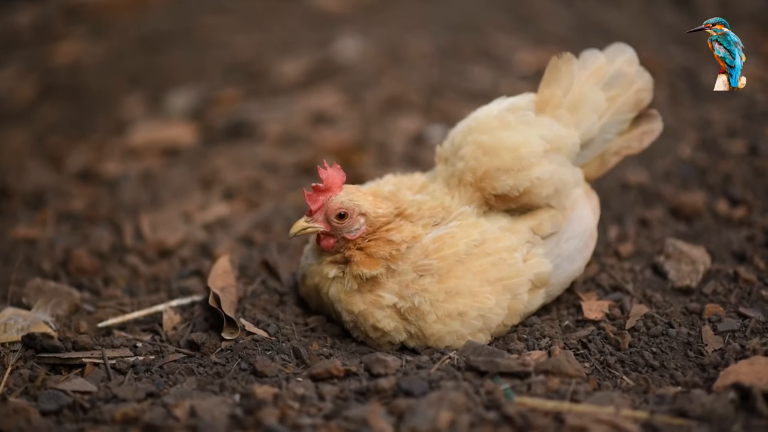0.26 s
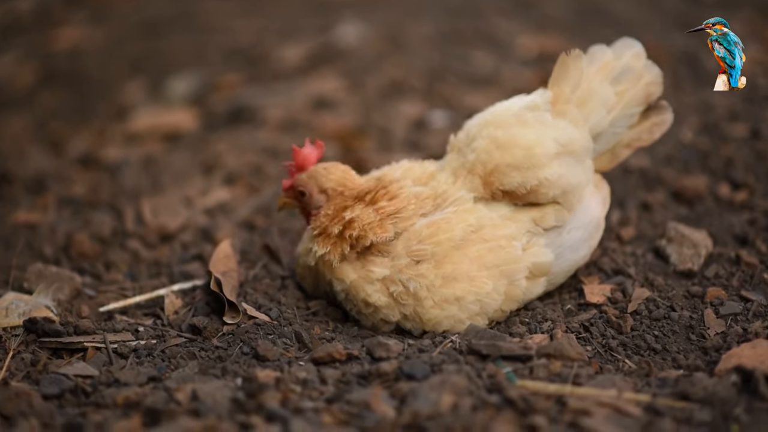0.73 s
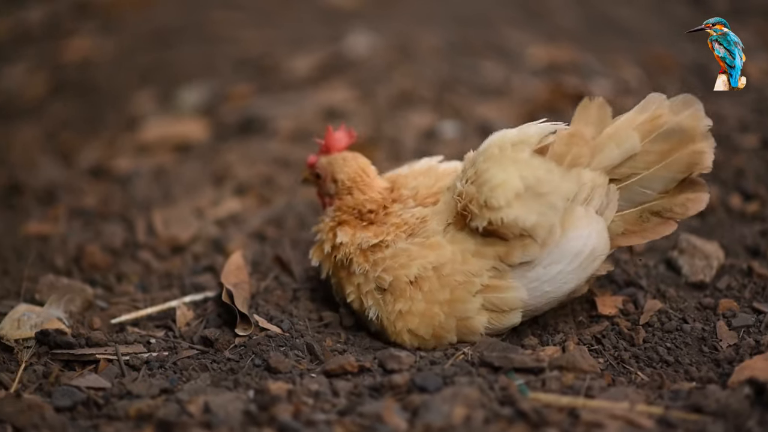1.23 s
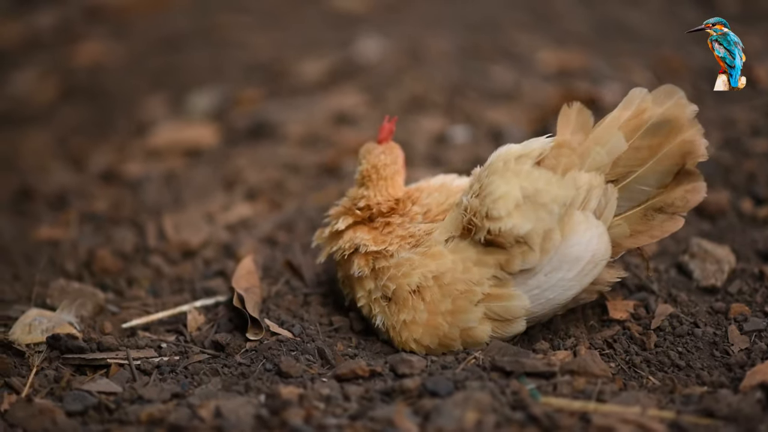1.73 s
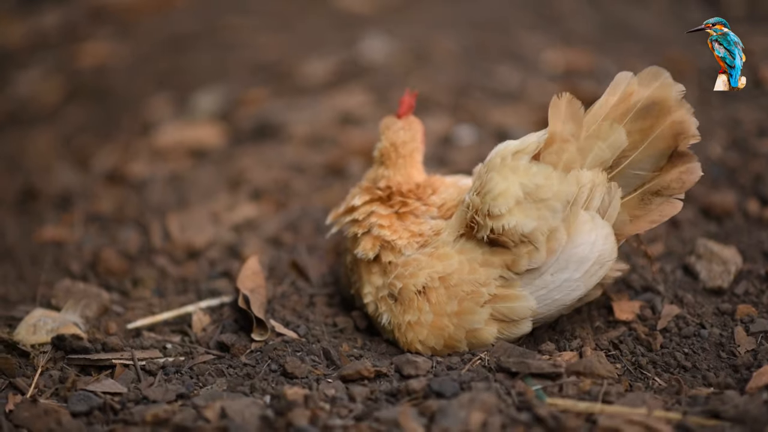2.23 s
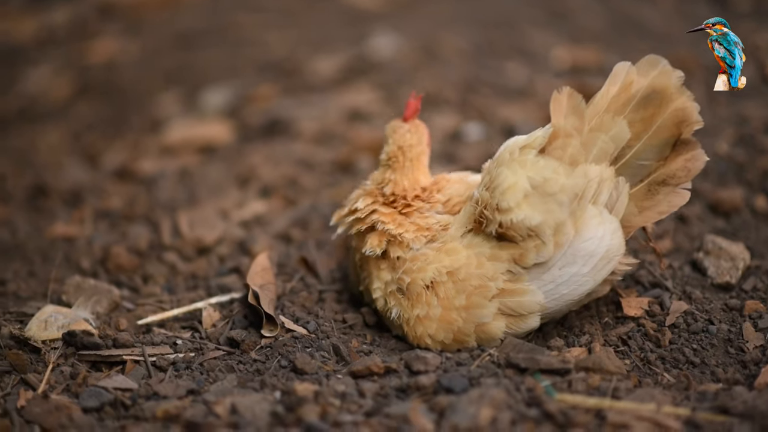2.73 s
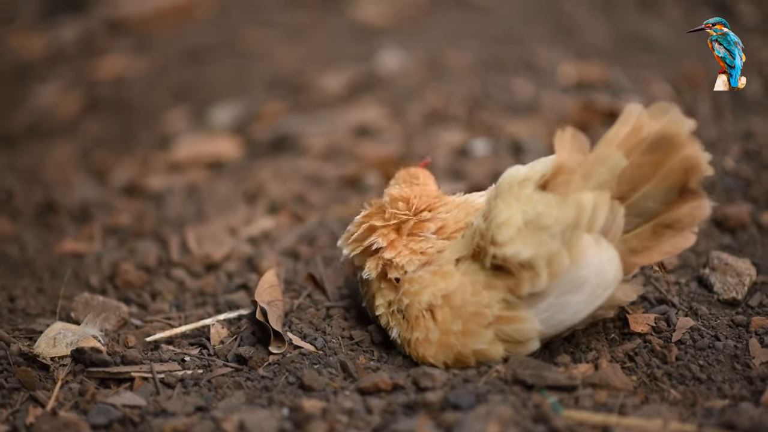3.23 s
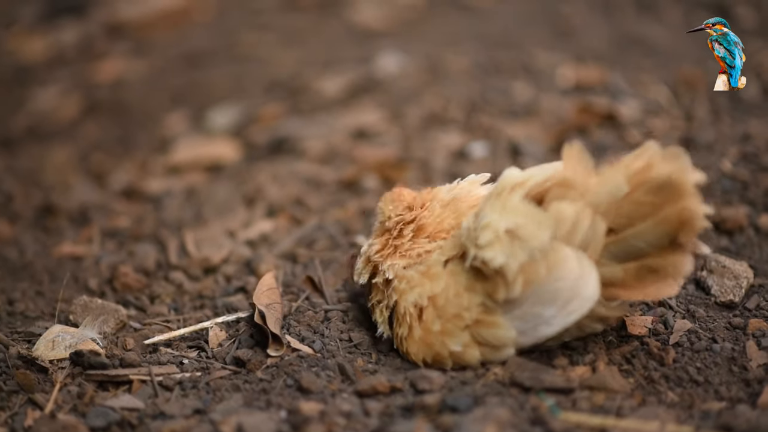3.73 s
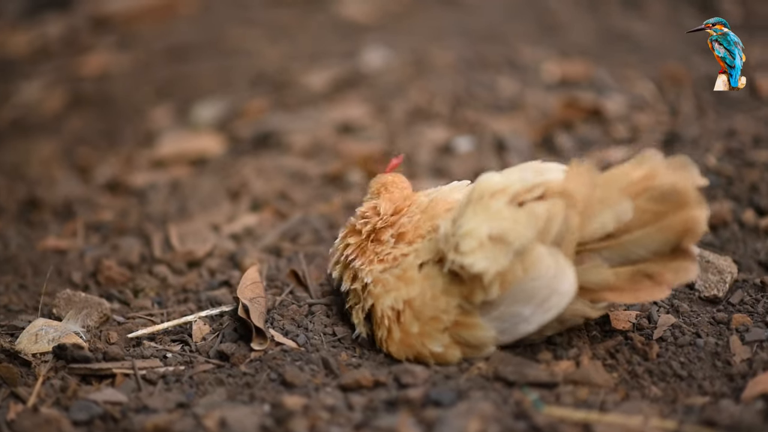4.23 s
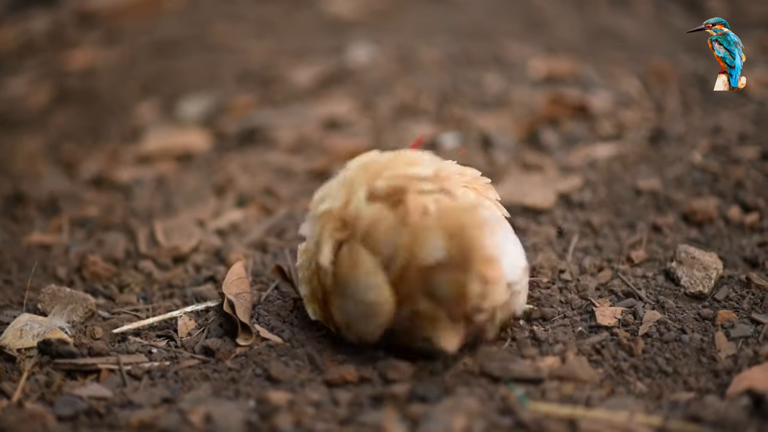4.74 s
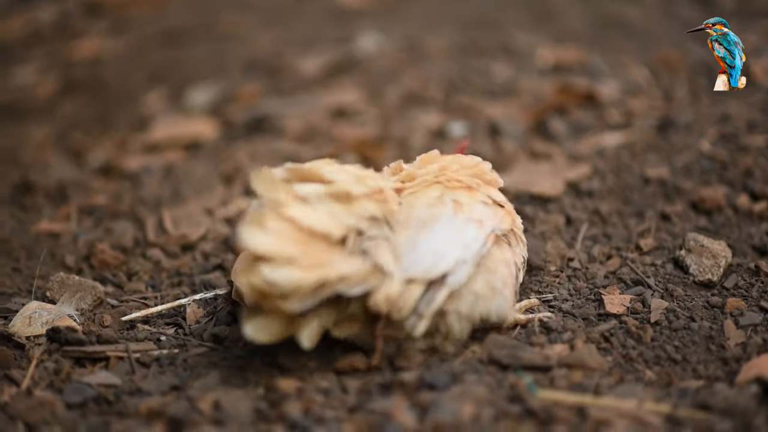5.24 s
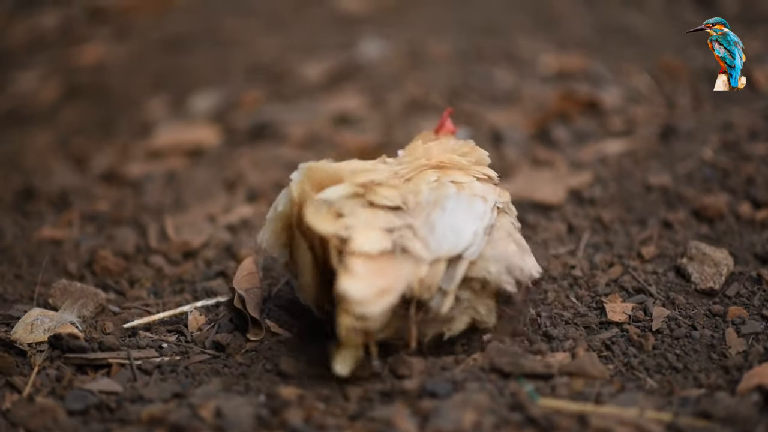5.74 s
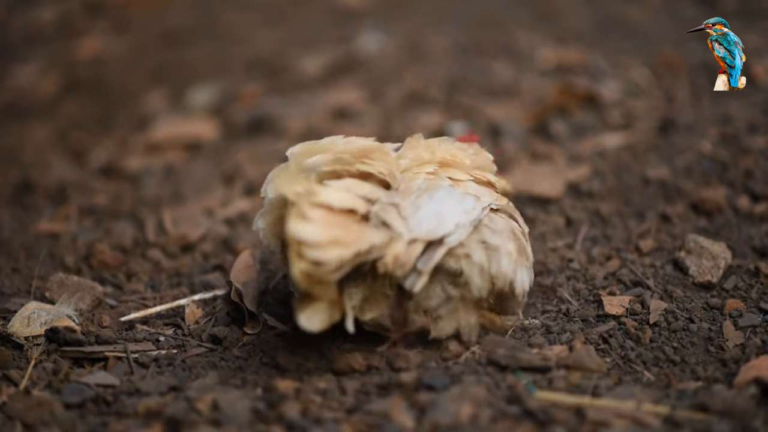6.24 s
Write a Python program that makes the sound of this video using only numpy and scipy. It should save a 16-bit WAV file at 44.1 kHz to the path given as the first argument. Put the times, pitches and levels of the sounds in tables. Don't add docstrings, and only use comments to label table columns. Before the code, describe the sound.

Raspy, strained cockerel crow in three parts with a held note, distant crows around it, followed by soft clucks, soil scratching and feather rustle.

```python
import sys
import numpy as np
from scipy import signal
from scipy.fft import rfft, irfft
from scipy.io import wavfile
from scipy.ndimage import uniform_filter1d

SR = 44100
rng = np.random.default_rng(int(sys.argv[2]) if len(sys.argv) > 2 else 0)


def store_pcm(level_fs):
    pcm = np.round(np.clip(level_fs, -1, 1) * 32767).astype(np.int16)
    wavfile.write(sys.argv[1], SR, np.atleast_2d(pcm).T)


def volts_from_db(level):
    exponent = np.asarray(level, float) / 20
    return 10 ** exponent


N = 285327
HZ = np.maximum(np.fft.rfftfreq(N, 1 / SR), 1)

# start_s, length_s, attack_s, level_db, sag_db
NEAR_HARSH = [(1.1, 0.16, .02, -23.5, 5), (1.373, .127, 0.016, -23, 8.5), (1.501, 0.084, 0.051, -23.5, 6),
              (1.642, .13, 0.0038, -24, 0), (1.77, 0.086, 0.0016, -23.5, 7), (1.997, 0.07, 0.033, -24, -1),
              (2.306, 0.032, 0.013, -31.5, 8), (2.424, 0.18, 0.0032, -25, 6),
              (2.061, 0.14, 0.0046, -45.5, 16.5), (2.291, 0.14, 0.011, -45, 2.5),
              (1.57, .08, .01, -35.5, 0)]
NEAR_BEAT_HZ = [864, 821, 899, 1011, 853, 826, 970, 901.3, 974, 972, 1010]
# resonance_hz, width_hz, level_db
OPENING_THROATS = [
    [(3600, 74, -19.0), (5900, 160, -22.0)] + [(860, 120, -12.0), (1450, 77, 3.5), (1836, 250, -3.5), (2454, 20.0, -4.0), (6260, 53, -23.5), (7600, 180, -7.0), (9260, 69, -15.0), (10400, 29, -24.0), (12100, 190, -28.5), (14250, 72, -32.0)],
    [(878, 11, -5.5), (1120, 150, -5.5)] + [(1510, 124, 1.5), (2075, 96, -5.0), (2542, 90, -0.5), (4044, 200, -5.5), (6915, 31, -14.0), (9080, 84, -7.5), (10020, 31, -15.5), (11330, 27, -15.5), (14260, 47, -43.5)],
    [(856, 8.8, -5.5)] + [(1067, 69.0, 0.5), (1477, 25.0, 9.0), (2010, 36, 9.5), (2485, 90, 1.0), (3940, 150, -0.5), (6740, 56, -6.0), (9030, 120, -3.0), (9960, 40, -5.5), (11100, 150, -10.5), (13700, 49, -30.0)],
]
# resonance_hz, width_hz, level_db
CLOSING_THROATS = [
    [(930, 64, -13.5), (3750, 240, -7.5)] + [(1463, 340, 9.5), (2485, 43, 6.5), (4635, 44, -8.5), (7170, 100, 1.5), (8620, 110, -2.5), (9940, 40, -14.0), (10920, 39, -10.0)],
    [(350, 110, -20.5), (815, 74, -7.0), (1430, 150, 1.0), (3600, 69, -12.0), (5320, 300, -17.5)] + [(1904, 120, 5.5), (2514, 64.0, -5.0), (6605, 32, -9.5), (7530, 46, -1.0), (8934, 80.0, -5.5), (11840, 162, -21.5), (13400, 39, -36), (14300, 37, -24.5)],
]
# resonance_hz, width_hz, level_db
LEAK_THROATS = [
    [(6700, 60, -6), (7280, 120, -1), (9200, 80, -9), (12200, 100, -14.5)],
    [(3800, 130, -9), (5190, 200, -15.5), (7500, 148, -0.5), (9100, 100, 2), (11500, 160, -12.5),
     (13000, 150, -12), (14500, 100, -14)],
    [(3950, 101, -6.5), (6900, 60, -3), (9050, 120, 4), (10000, 60, -3), (11380, 150, -6),
     (12800, 101, -16)],
]
THROAT_USED = [0, 1, 1, 2, 2, 3, 4, 4, 5, 6, 7]
# centre_hz, width_hz
DARK_POCKETS = [(4500, 350), (8150, 340)]
# centre_hz, width_hz
MIDDLE_POCKETS = [(5800, 480), (7800, 500)]
# time_s, pitch_hz, level_db (of second partial)
NEAR_CLEAR = [
    [(1.54, 985, -28), (1.575, 1013, -22.5), (1.64, 1027, -22), (1.67, 1011, -27.5), (1.74, 1015, -26),
     (1.775, 990, -26.5)],
    [(2.062, 977, -19.5), (2.16, 976.6, -19.5), (2.21, 972, -19.5), (2.32, 970, -20), (2.418, 971, -19.5),
     (2.445, 981, -28.5)],
]
# partial, level_db
CLEAR_ORDERS = [
    [(1, -5.5), (2, -1.5), (3, -21.5), (4, -10.5), (5, -37.5), (6, -60), (7, -30.5), (8, -36), (9, -16),
     (10, -30), (11, -30)],
]
# partial, mid_level_db, change_db
HELD_ORDERS = [(1, -18.5, 2), (2, -1, 3.5), (3, -29, -0.5), (4, -27.5, -0.5), (5, -41.5, 4.5), (6, -41, 20),
               (7, -14, 3), (8, -28, -1), (9, -12.5, -15), (10, -30, -2), (11, -32, 7), (12, -27.5, -13.5),
               (13, -32.5, -4), (14, -42, 1.5), (15, -39, 17), (16, -44, 3)]
# time_s, pitch_hz, level_db
WHISTLES = [
    [(1.084, 2350, -50.5), (1.092, 2000, -38), (1.097, 1900, -31.5), (1.101, 1450, -30.5),
     (1.107, 1280, -27), (1.112, 1600, -28), (1.119, 1700, -27)],
    [(1.366, 1650, -38), (1.371, 1420, -26), (1.375, 1320, -24), (1.378, 1550, -24.5), (1.385, 1650, -21.5),
     (1.391, 1760, -27)],
]
# partial, level_db
START_ORDERS = [(1, 2), (2, -26.5)]
# time_s, pitch_hz, level_db
SAG_OUT = [
    (2.54, 973, -37.5),
    (2.572, 877, -34),
    (2.583, 763, -30.5),
    (2.594, 740, -28),
    (2.606, 683, -32),
    (2.622, 575.4, -38),
    (2.632, 540, -54),
]
# partial, mid_level_db, change_db
END_ORDERS = [(1, -9, 4), (2, -2.5, 0.5), (3, -6.5, 23), (4, -20, 8), (5, -32, 0)]
# start_s, length_s, from_hz, to_hz, level_db
SQUEALS = [(1.372, .125, 2700, 2490, -28.5), (1.77, 0.07, 1500, 1900, -27.5),
           (1.15, 0.11, 1800, 1915, -22.5), (1.46, 0.075, 1550, 1540, -23.5),
           (1.978, 0.034, 2640, 2450, -25), (2.005, 0.04, 1730, 1520, -21.5),
           (2.424, 0.13, 1950, 1935, -21.5), (1.099, 0.015, 3000, 2400, -24),
           (1.368, .011, 3000, 2350, -17.5), (1.11, 0.077, 1600, 1640, -28.5),
           (1.115, 0.094, 2450, 2380, -33.5), (1.768, .09, 2480, 2500, -27.5), (1.8, .08, 2500, 2450, -30),
           (1.4, 0.045, 2300, 2520, -28), (2.52, 0.067, 1800, 1820, -28), (2.535, .035, 2200, 1960, -25.5),
           (2.44, 0.089, 2450, 2430, -31.5), (2.035, 0.052, 2200, 2100, -29)]
# partial, level_db
SQUEAL_ORDERS = [(1, -4), (2, -29.5)]


def near_bird():
    rough, held = np.zeros((2, N))
    throats = OPENING_THROATS + CLOSING_THROATS + LEAK_THROATS
    for rows, k, beat_hz in zip(NEAR_HARSH, THROAT_USED, NEAR_BEAT_HZ):
        start, sound = harsh_voice(syllable(*rows), throats[k], beat_hz, jitter=.16, uneven_db=4.4,
                                   widen=2.88, breath=.035, trim_db=3)
        bands = DARK_POCKETS + MIDDLE_POCKETS * (k in {1, 2, 7})
        add(rough, start, pockets(sound, bands))
    orders_each = CLEAR_ORDERS + [HELD_ORDERS]
    for rows, orders, waver, flutter_db in zip(NEAR_CLEAR, orders_each, (.009, .0005), (2.5, .25)):
        add(held, *clear_voice(rows, orders, waver, flutter_db))
    for rows, orders in [(w, START_ORDERS) for w in WHISTLES] + [(SAG_OUT, END_ORDERS)]:
        add(rough, *clear_voice(rows, orders, waver=.0087, flutter_db=1.0))
    for rows in SQUEALS:
        add(rough, *clear_voice(slide(*rows), SQUEAL_ORDERS, waver=.021, flutter_db=-0.5))
    return rough, held


# start_s, length_s, attack_s, level_db, sag_db
FAR_HARSH = [
    (0.028, 0.135, 0.047, -30.5, 12),
    (.285, 0.53, 0.005, -39, 27),
    (5.984, .315, 0.06, -41.5, 18),
    (6.345, 0.12, 0.014, -38, -6.5),
]
FAR_BEAT_HZ = [1094, 1061, 1261, 1269]
# resonance_hz, width_hz, level_db
FAR_THROATS = [
    [(1440, 86, 0.0), (7360, 770, -11.0)] + [(1120, 60, -5), (2658, 76, 8.0), (3106, 21, 7.0), (4270, 170, 8.0), (6180, 210, -1.0), (11500, 72, -34), (12680, 51, -16)],
    [(1600, 180, -7), (5460, 170, -15.0)] + [(1268, 170, -9.5), (2350, 75, -18.0), (2450, 37, 6.5), (2970, 430, -2.0), (4500, 16, 4), (6170, 140, -4.0), (9500, 13, -6.0), (10940, 83, -20.5), (12700, 91, -23.5)],
    [(1200, 170, -18), (2580, 160, -9), (3340, 93, -2), (4480, 45, -3.5), (6500, 74, -19), (9400, 220, -17.5), (10100, 37, -14.5), (12500, 38, -34)],
    [(1316, 250, -14.5), (2600, 140, -5), (3510, 77, -2), (4600, 135, -3), (6960, 190, -10.5), (9350, 80, -13), (12000, 51, -22), (13320, 39, -29.5), (14300, 32, -41)],
]
# time_s, pitch_hz, level_db (of second partial)
FAR_CLEAR = [
    (.11, 1232, -42.5),
    (.15, 1241, -34),
    (.2, 1225, -34.5),
    (.25, 1188, -34),
    (.29, 1124, -46.5),
    (.36, 1107, -73),
    (.5, 1040, -96),
]
# partial, level_db
FAR_ORDERS = [(1, -13.5), (2, -3), (3, -14), (4, -11.5), (5, -6), (6, -31), (7, -17), (8, -9), (9, -22.5),
              (10, -21.5), (11, -23.5)]
# time_s, pitch_hz, level_db
FAR_FADE = [
    (.25, 1189, -53.5),
    (.29, 1125, -46.5),
    (.33, 1098, -45),
    (.42, 1074, -56.5),
    (.52, 1030, -62),
]
# partial, level_db
FADE_ORDERS = [(1, -1.5), (2, -12), (3, -13), (4, -4)]
# time_s, resonance_hz, level_db
FAR_RINGS = [
    [(.05, 3150, -47), (.1, 3155, -39.5), (.28, 3137, -54)],
    [(.36, 4430, -50), (.55, 4400, -50.5), (.76, 4396, -63.5)],
    [(.3, 3207, -51), (.6, 3158, -53), (.72, 3140, -64)],
    [(6.0, 4446, -58), (6.05, 4480, -49.5), (6.22, 4500, -58)],
    [(6.37, 4700, -48), (6.4, 4700, -45), (6.47, 4640, -49)],
]
# time_s, pitch_hz, level_db
FAR_RETURN = [
    [(5.99, 1260, -65), (6.03, 1200, -57), (6.07, 1300, -50.5), (6.15, 1305, -46.5), (6.21, 1300, -51.5),
     (6.28, 1270, -63)],
    [(6.35, 1290, -48.5), (6.39, 1300, -47.5), (6.43, 1290, -45), (6.47, 1290, -40.5)],
]
# partial, level_db
RETURN_ORDERS = [(1, -12), (2, -1), (4, -15.5)]


def far_bird():
    out = np.zeros(N)
    for rows, throat, beat_hz in zip(FAR_HARSH, FAR_THROATS, FAR_BEAT_HZ):
        add(out, *harsh_voice(syllable(*rows), throat, beat_hz, jitter=.075, uneven_db=3.5,
                              widen=3.1, breath=.05, trim_db=1.0))
    add(out, *clear_voice(FAR_CLEAR, FAR_ORDERS, waver=.005, flutter_db=3))
    add(out, *clear_voice(FAR_FADE, FADE_ORDERS, waver=.016, flutter_db=5))
    for rows in FAR_RINGS:
        add(out, *clear_voice(rows, SQUEAL_ORDERS[:1], waver=.008, flutter_db=5))
    for rows in FAR_RETURN:
        add(out, *clear_voice(rows, RETURN_ORDERS, waver=.018, flutter_db=5))
    return out


def harsh_voice(rows, throat, beat_hz, jitter, uneven_db, widen, breath, trim_db):
    start, fade, (level_db,) = played(rows, fade_s=0.0089)
    run_in = 2000
    count = len(fade) + run_in
    loose = np.clip(.85 + .3 * drift(25, count), .3, 1.2)
    wander = jitter * loose * drift(400, count) + .015 * drift(30, count)
    turns = np.cumsum(beat_hz * np.exp(wander)) / SR
    closes = np.diff(np.floor(turns), prepend=0) > 0
    strong_weak_db = 1.9 * (-1) ** np.floor(turns)
    sizes = volts_from_db(uneven_db * loose * np.clip(rng.standard_normal(count), -3, 1.2) + strong_weak_db)
    source = closes * sizes + breath * rng.standard_normal(count)
    sound = 0
    for k, (hz, width_hz, db) in enumerate(throat):
        r = np.exp(-np.pi * widen * (width_hz + 40 + .012 * hz) / SR)
        pole = [(1 - r * r) / 2, 0, -(1 - r * r) / 2, 1, -2 * r * np.cos(2 * np.pi * hz / SR), r * r]
        torn = volts_from_db(3.1 * drift(37.95, count))
        ring = signal.sosfilt([pole, pole], source)
        sound = sound + (-1) ** k * volts_from_db(db) * torn * ring
    sound = signal.sosfilt(signal.butter(2, 300, "high", fs=SR, output="sos"), sound)
    power = uniform_filter1d(sound ** 2, 500) + 1e-12
    sound = (sound / power ** .35)[run_in:]
    return start, fade * volts_from_db(level_db + trim_db) * sound / np.std(sound)


def clear_voice(rows, orders, waver, flutter_db):
    start, fade, (pitch_hz, level_db) = played(rows)
    count = len(fade)
    turns = np.cumsum(pitch_hz * (1 + waver * drift(89, count))) / SR
    share = np.linspace(-.5, .5, count)
    partials = 0
    for k, db, *change_db in orders:
        flutter = (flutter_db + .2 * max(k - 2, 0)) * drift(27, count)
        level = volts_from_db(db + sum(change_db) * share + flutter)
        partials = partials + level * np.sin(2 * np.pi * (k * turns + rng.random()))
    return start, np.sqrt(2) * fade * volts_from_db(level_db) * partials


def syllable(s, length_s, attack_s, level_db, sag_db):
    share = np.linspace(0, 1, num=9)
    times_s = s + attack_s + (length_s - attack_s) * share
    return [(s, level_db - 13)] + list(zip(times_s, level_db - sag_db * share ** 1.87))


def slide(s, length_s, from_hz, to_hz, level_db):
    settle_s, swell_s, swell_from_db = 0.01392, 0.019, -14.5
    t = np.linspace(0, length_s, num=30)
    pitch_hz = to_hz + (from_hz - to_hz) * np.exp(-t / settle_s)
    return list(zip(s + t, pitch_hz, level_db + swell_from_db * np.clip(1 - t / swell_s, 0, 1)))


def pockets(x, bands):
    notches = [np.concatenate(signal.iirnotch(hz, hz / width_hz, SR)) for hz, width_hz in bands]
    return signal.sosfilt(notches * 2, x)


# start_s,
# length_s, # pitch_hz, level_db, open_beak_lift_db (second partial)
CLUCKS = [(0.158, 0.02, 330, -71, 9), (0.491, 0.05, 317, -73, 6), (0.76, 0.039, 365, -74, 6.5),
          (0.922, 0.087, 1610, -72, -20), (2.615, 0.031, 290, -61, -14), (2.303, 0.031, 280, -70, -6),
          (3.238, 0.029, 406, -58.5, -17), (3.429, 0.028, 660, -77, 7.5), (3.521, 0.044, 287, -60, 0.5),
          (3.763, 0.033, 502, -72, -10), (3.862, 0.048, 318.5, -57, 3), (4.149, 0.032, 280, -67.5, -6),
          (4.279, 0.031, 374, -60, -8), (4.529, 0.019, 350, -71.5, 3.0), (4.622, 0.034, 683, -65, -7.5),
          (4.774, 0.019, 339, -71, 5.5), (5.37, 0.034, 387, -75, 10), (5.519, 0.052, 653, -67.5, -9.5),
          (5.693, 0.064, 634, -67.5, -11), (5.893, 0.071, 695, -69.5, 3.5)]
# start_s, length_s, pitch_hz, level_db
PEEPS = [
    (3.216, 0.0092, 8630, -57.5),
    (3.308, 0.02, 8600, -67),
]
UPPER_DB = [-12, -17.5, -25.5]


def small_voices():
    out = np.zeros(N)
    for s, length_s, pitch_hz, level_db, *open_db in CLUCKS + PEEPS:
        share = np.arange(round(length_s * SR)) / (length_s * SR)
        sag = 12 / pitch_hz * (.5 - share ** 2)
        turns = np.cumsum(pitch_hz * (1 + sag + .018 * drift(70, len(share)))) / SR
        upper_db = UPPER_DB if pitch_hz < 450 else UPPER_DB[:1]
        levels_db = [level_db] + [level_db + lift + db for lift in open_db for db in [0, *upper_db]]
        partials = sum(volts_from_db(db) * np.sin(2 * np.pi * k * turns) for k, db in enumerate(levels_db, 1))
        add(out, round(s * SR), 2.33 * np.sin(np.pi * share ** 0.46) * partials)
    return out


# freq_hz, level_db_per_hz
SCRATCH_COLOUR = [(880, -6.5), (1500, -3), (1700, -13), (2380, -4.5), (4420, -3.5), (9050, 4), (10700, -2),
                  (13400, -5), (15700, -25)]
# middle_s, length_s, level_db
RAKES = [
    (.874, 0.044, -56),
    (4.78, 0.17, -52),
    (4.97, 0.089, -55.5),
    (5.13, 0.092, -54),
    (5.31, 0.093, -53),
    (5.48, 0.27, -58),
    (5.69, 0.19, -51.5),
    (5.84, 0.19, -54),
    (6.05, 0.39, -58),
]
# middle_s, length_s, level_db
SHUFFLES = [
    (3.81, 0.32, -50.5),
    (4.38, 0.35, -58.5),
    (4.6, 0.14, -61),
    (5.35, 2.2, -58),
    (6.19, 0.36, -51.5),
]
# start_s, peak_db, left_minus_right_db
GRIT = [
    (3.2166, -58, 0),
    (3.5256, -44, -11.5),
    (4.7823, -40, 8),
    (4.921, -38.5, 25),
    (5.419, -39, 17),
    (5.487, -36, 12),
    (5.6793, -42, 3.5),
    (5.707, -36, -2.5),
    (5.8766, -33.5, 14),
]


def scratching():
    halves = np.array([[.5], [-.5]])
    hits = rng.random((2, N)) < 9000 / SR
    grains = hits * volts_from_db(2.27 * rng.exponential(1, (2, N))) * rng.standard_normal((2, N))
    grains = irfft(rfft(grains + 0.22 * grains[::-1]) * volts_from_db(at_hz(SCRATCH_COLOUR)), N)
    grains = grains * volts_from_db(1.36 * drift(35, N))
    grains = grains / np.std(grains)
    out, pebbles = np.zeros((2, N)), np.zeros((2, N))
    for strokes, pan_db in (RAKES, 10.5), (SHUFFLES, 2.5):
        for middle_s, length_s, level_db in strokes:
            start = round((middle_s - length_s / 2) * SR)
            swell = np.sin(np.linspace(0, np.pi, round(length_s * SR)))[1:-1] ** 1.43
            level = volts_from_db(level_db - 5.5 + halves * pan_db)
            add(out, start, swell * level * grains[:, start:start + len(swell)])
    t = np.arange(300) / SR
    for s, peak_db, pan_db in GRIT:
        click = rng.standard_normal(300) * np.exp(-t / .0012)
        add(pebbles, round(s * SR), volts_from_db(peak_db - 10 + halves * pan_db) * click)
    return out + signal.sosfilt(signal.butter(2, [3000, 12000], "band", fs=SR, output="sos"), pebbles)


# freq_hz, level_db_per_hz
AIR = [(13, -41), (22, -23), (58, 1.5), (92, 2), (221, -6.5), (373, -14), (851, -13.5), (1030, -14),
       (1220, -12), (1430, -15), (1790, -14), (5370, -21), (8570, -19), (14000, -33.5), (15700, -53)]
# freq_hz, correlation
AIR_LIKENESS = [(60, .5), (130, .8), (290, 0.99), (640, 0.8), (1410, 0.09), (3100, 0.05), (6820, 0.56),
                (15000, 0.8)]


def air():
    mid, side = rfft(rng.standard_normal((2, N))) * volts_from_db(at_hz(AIR))
    alike = np.clip(at_hz(AIR_LIKENESS), -1, 1)
    out = irfft(np.sqrt(1 + alike) * mid + np.sqrt(1 - alike) * side * [[1], [-1]], N)
    return volts_from_db(-59.5 + 0.58 * drift(1.0, N)) * out / np.std(out)


def drone():
    tone_hz, width_hz, level_db = 78.7, 9.8, -68.5
    tone = irfft(rfft(rng.standard_normal(N)) / (1 + ((HZ - tone_hz) / width_hz) ** 2), N)
    return volts_from_db(level_db) * tone / np.std(tone)


# freq_hz, lead_rad
LEAD = [(0, 0), (780, 0.2), (1890, 2.1), (3010, 1.6), (4220, 3.5), (4650, 3.5), (5170, 4.5), (6800, 6.3),
        (12300, 6.3), (12700, 3.4), (12900, 6.2), (15400, 6.5)]


def ports(*sources):
    ripple = uniform_filter1d(rng.standard_normal(len(HZ)), size=1200)
    from_hz, full_hz = 4800, 11000
    scatter_rad = 1.1 * ripple / np.std(ripple) * np.clip((HZ - from_hz) / (full_hz - from_hz), 0, 1)
    lead = np.exp(1j * np.outer([.5, -.5], at_hz(LEAD) + scatter_rad))
    out = 0
    for x, lean in sources:
        pair = volts_from_db(np.outer([.5, -.5], at_hz(lean))) * lead
        out = out + rfft(x) * pair / np.maximum(abs(pair.mean(axis=0)), .7)
    return irfft(out, N)


# freq_hz, t60_s
YARD_T60 = [(300, 0.29), (1500, 0.29), (4000, 0.39), (12000, 0.35)]


def yard(x):
    t, tail = np.arange(SR // 2) / SR, 0
    edges_hz = [20] + [np.sqrt(a[0] * b[0]) for a, b in zip(YARD_T60, YARD_T60[1:])] + [18000]
    for (_, t60_s), low, high in zip(YARD_T60, edges_hz, edges_hz[1:]):
        sos = signal.butter(2, [low, high], "band", fs=SR, output="sos")
        band = signal.sosfilt(sos, rng.standard_normal((2, len(t))))
        decay_db = -60 * t / t60_s
        tail = tail + band * (volts_from_db(decay_db) + volts_from_db(-21.5 + decay_db / 2))
    bass = signal.butter(2, 800, fs=SR, output="sos")
    tail[1] += signal.sosfilt(bass, tail[0] - tail[1])
    tail = tail * np.clip((t - .006) / 0.0089, 0, 1)
    return signal.fftconvolve(x[None], tail / np.sqrt(np.sum(tail ** 2) / 2))[:, :N]


def at_hz(points):
    hz, value = np.transpose(points)
    return np.interp(np.log(HZ), np.log(np.maximum(hz, 1)), value)


def played(rows, fade_s=0.0016):
    s, *columns = np.transpose(rows)
    t = np.arange(round(s[0] * SR), min(round(s[-1] * SR), N)) / SR
    fade = np.clip(np.minimum(t - s[0], s[-1] - t) / fade_s, 0, 1)
    return round(s[0] * SR), fade, [np.interp(t, s, c) for c in columns]


def add(out, start, sound):
    out[..., start:start + sound.shape[-1]] += sound


def drift(rate_hz, count):
    sos = signal.butter(2, rate_hz, fs=SR, output="sos")
    slow = signal.sosfilt(sos, rng.standard_normal(count + 8000))[8000:]
    return slow / np.std(slow)


# freq_hz, left_minus_right_db
LEAN = [(380, 0.0), (700, 3.0), (1290, 5.5), (2380, 4.5), (3400, 0.0), (5500, 0.0), (9000, 2.5),
        (12000, 6.0)]
# freq_hz, left_minus_right_db
HELD_LEAN = [(380, 0.0), (970, 7.0), (1950, 10.0), (2900, 4.0), (3900, -4.0), (4850, 3.0), (6800, 3.5),
             (8800, 8.5)]


def scene():
    (near, held), far, small = near_bird(), far_bird(), small_voices()
    direct = ports((near + volts_from_db(-5.5) * far, LEAN), (held, HELD_LEAN)) + small * volts_from_db([[.6], [-.6]])
    thin_small = signal.sosfilt(signal.butter(2, 520, "high", fs=SR, output="sos"), small)
    wet = volts_from_db(-18) * held + volts_from_db(-7.0) * near + volts_from_db(-4) * far + volts_from_db(-3.5) * thin_small
    echoes = yard(wet) * volts_from_db([[1.5], [-1.5]])
    return direct + echoes + scratching() + air() + drone()


def low_pass(x):
    return signal.sosfilt(signal.butter(12, 15830, fs=SR, output="sos"), x)


def record(dry):
    both = volts_from_db(1.5) * dry
    mid, side = both.mean(axis=0), (both[0] - both[1]) / 2
    side = irfft(rfft(side) * np.maximum(1 / (1 + (430 / HZ) ** 6), .14), N)
    top_cut = signal.cheby2(10, 50, 16200, fs=SR, output="sos")
    both = signal.sosfilt(top_cut, np.array([mid + side, mid - side]))
    return low_pass(both)


dry = scene()
out = record(dry)
store_pcm(out)
```